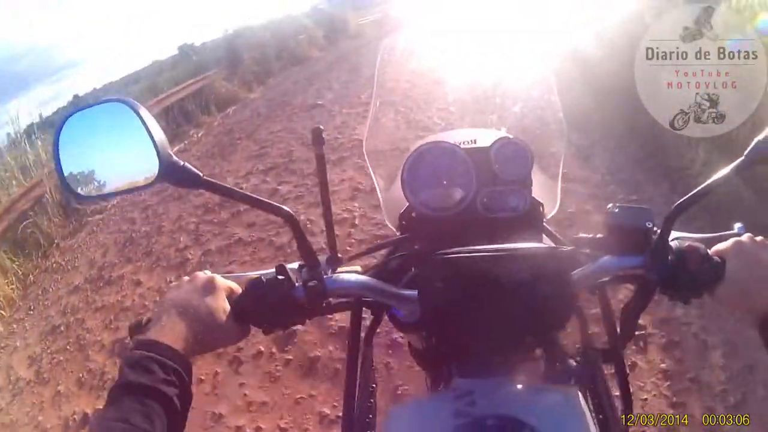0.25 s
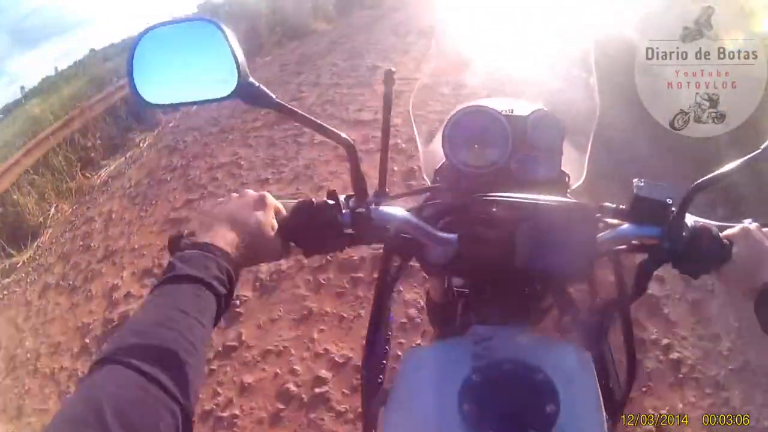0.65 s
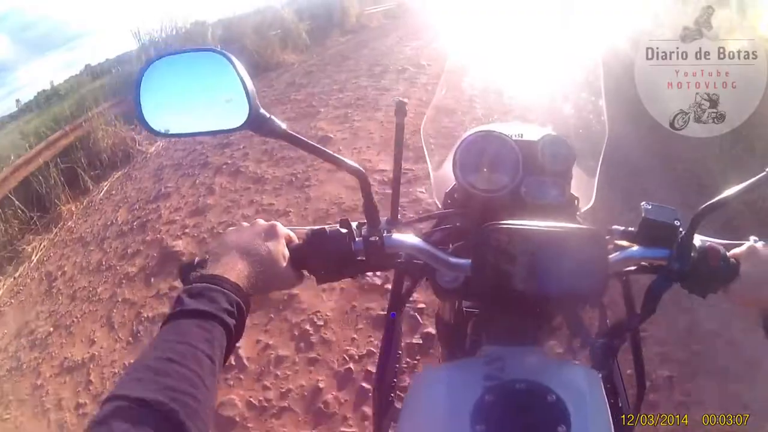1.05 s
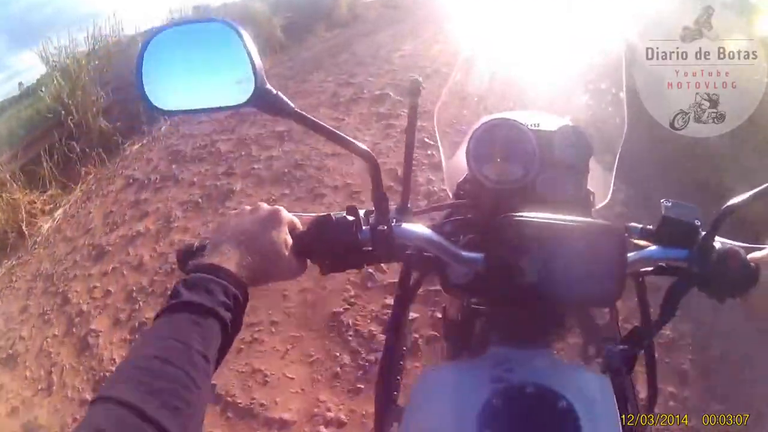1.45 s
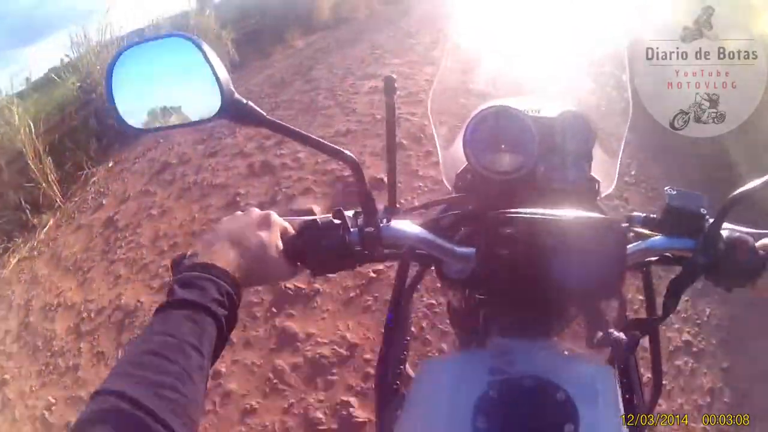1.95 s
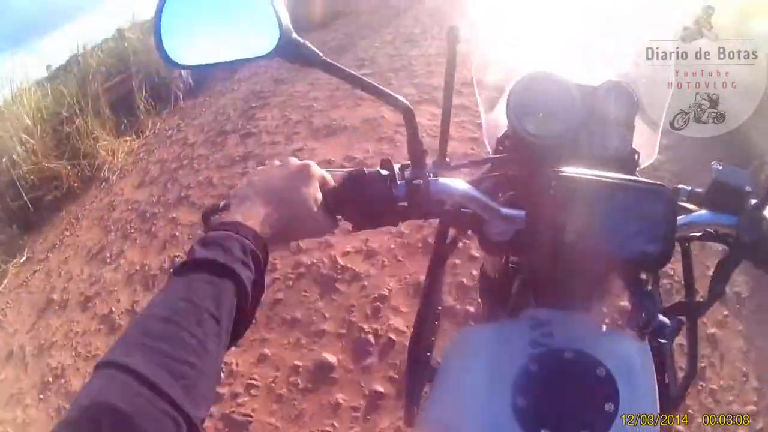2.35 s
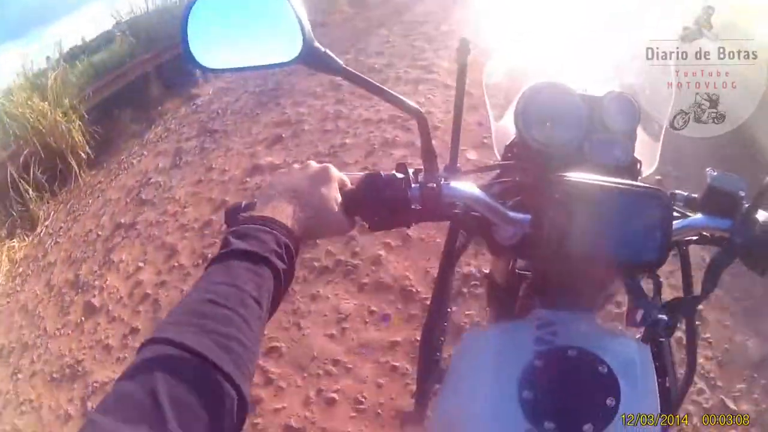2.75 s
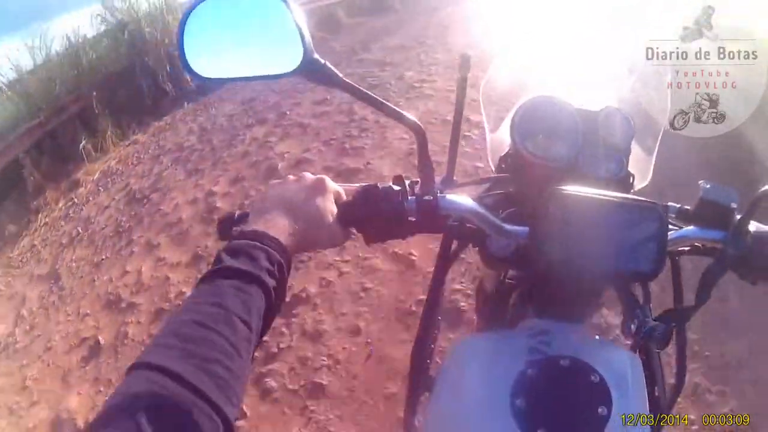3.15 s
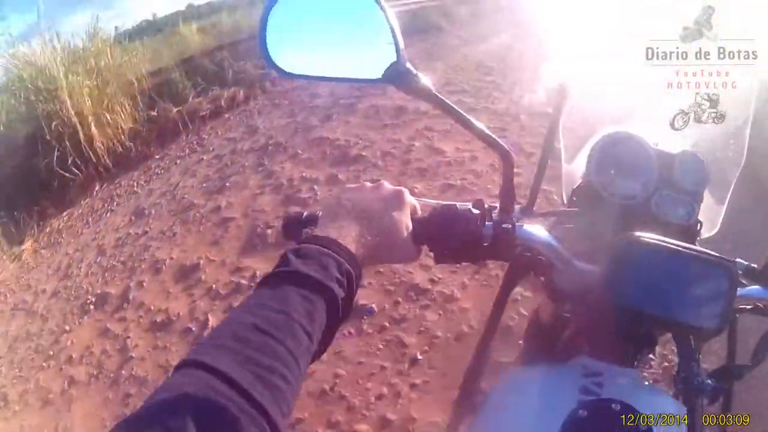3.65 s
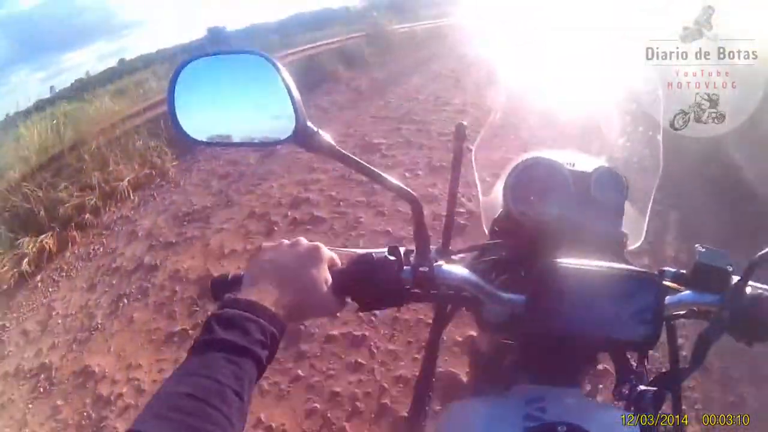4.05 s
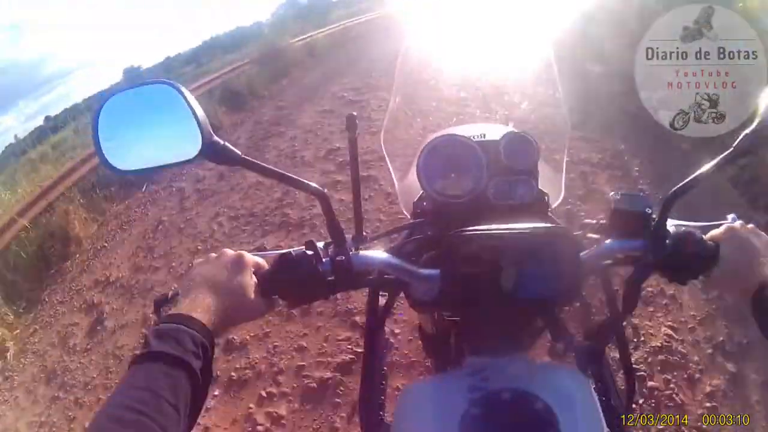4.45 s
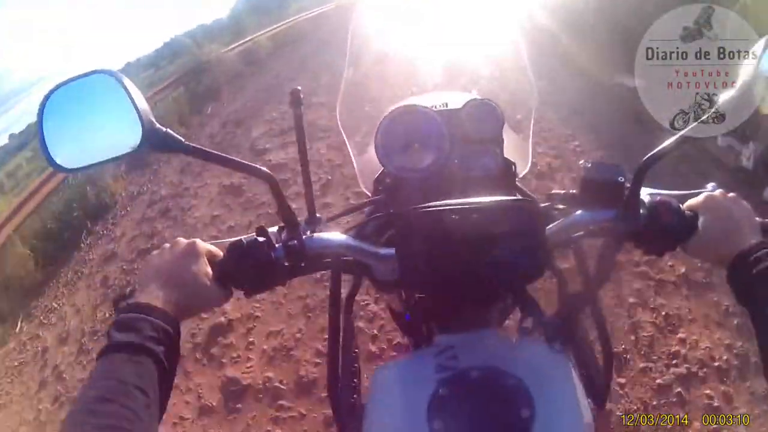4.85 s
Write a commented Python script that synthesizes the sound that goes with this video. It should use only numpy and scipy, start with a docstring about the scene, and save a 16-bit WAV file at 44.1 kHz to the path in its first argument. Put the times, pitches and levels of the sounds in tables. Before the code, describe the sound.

A single-cylinder motorcycle idles fast, close to a helmet microphone outdoors, with no audible echo. The exhaust makes soft, hollow low thumps about fifteen times a second, hunting a little in the first half second, briefly stronger near 2.3 s, then even. Dense dull metallic valve rattle pulses with it, and loose parts ring very faintly. Low rumble of tyres on dirt lies underneath. Small sharp metal ticks fall irregularly, clearest at 0.03, 1.6, 4.2 and 4.5 s. From 1.2 to 2.2 s the mount is jolted repeatedly, with deep muffled thuds, gritty scuffs and short woody stone knocks. Lighter jolts come at 2.6 and 3.4-3.6 s, leaving calm between. A faint short squeak at 4.6-4.75 s leads into the largest scuffing bump at 4.9 s, and jolting continues to the end. A constant high, buzzing electronic whine around 10 kHz and faint hiss persist throughout; the extreme top is cut off.

```python
"""A steady exhaust thump is heard first: a single-cylinder motorcycle idling as it rolls over a stony track.
Each firing excites damped pipe resonances, and dense valve contacts rattle through the modes of the cases.
Jolts of the microphone mount scuff and thud as shaped noise over the coloured noise of the rolling tyres.
Stones and small metal parts ring as struck modes, a joint squeaks by friction, and loose parts ring.
The helmet camera adds a buzzing whine, a tone of switched polarity, and a faint hiss."""
import sys
import numpy as np
from scipy import signal
from scipy.fft import rfft, irfft
from scipy.io import wavfile

SR = 44100
rng = np.random.default_rng(int(sys.argv[2]) if len(sys.argv) > 2 else 0)


def wrap_up_sound(samples):
    """Save the sound to the file named by the first command line argument, as 16-bit audio."""
    columns = np.atleast_2d(samples).T
    # keep every value between -1 and 1, then stretch to whole-number steps
    tamed = np.clip(columns, -1, 1)
    steps = np.round(tamed * 32767).astype(np.int16)
    wavfile.write(sys.argv[1], SR, steps)


N = 224896
TIME = np.arange(N) / SR   # s

# crankshaft speed, hunting at first and then settling: start_s, speed_rpm
CRANK_SPEED = [(0.0, 1627.1), (0.2, 1639.3), (0.4, 1938.3), (0.5, 1601.8), (0.65, 1813.0), (0.95, 1713.2),
               (1.1, 1807.1), (1.35, 1752.4), (1.55, 1829.9), (1.8, 1783.6), (2.2, 1807.7), (2.3, 1585.4),
               (2.4, 1840.7), (2.6, 1751.8), (2.75, 1821.6), (3.85, 1821.7), (4.0, 1832.4), (5.1, 1833.6)]
START_CYCLE, TURNS_PER_CYCLE = .744, 2   # engine cycles; crankshaft turns
FIRING_SCATTER_S = .0007
# strength of the exhaust thump, before each resonance's own level: start_s, level_db
THUMP_LEVEL = [(0, -31), (.45, -33), (.6, -30), (2.1, -33.5), (2.33, -27), (2.53, -32), (5.1, -32)]
# exhaust resonances: pitch_hz, width_hz, level_db, build_up_stages, lag_s
EXHAUST_MODES = [(52, 23, -15, 2, .004), (94, 52, -1, 2, 0), (289, 90, -3.5, 3, .0022),
                 (395, 140, -10, 3, .0022)]
# level of the valve rattle: start_s, level_db
RATTLE_LEVEL = [(0, -50), (1.2, -48), (2.5, -47), (4.3, -49), (5.1, -46.5)]
# resonances of the engine cases: pitch_hz, width_hz, level_db
CASE_MODES = [(511.4, 70, -4), (865.5, 33, -1.5), (909.6, 28, -8.5), (968, 20, -1.5), (1019, 21, -1),
              (1101, 71, -7.5), (1338, 308, -4.5), (1980, 280, -16), (2290, 185, -15.5), (2870, 620, -18.5),
              (4300, 530, -23.5), (5250, 900, -41)]
# jolts through the microphone mount, edge and thud relative to the scuff:
# peak_s, scuff_db, rise_s, fall_s, edge_db, thud_db
JOLT_EVENTS = [(1.232, -35, 0.067, 0.044, -22, 8), (1.378, -30, 0.057, 0.065, -8.5, 7),
               (1.46, -52.5, 0.04, 0.024, -27, 8.9), (1.612, -38, .012, 0.044, -13, 8.5),
               (1.648, -37.5, 0.05, 0.062, -20, 5.8), (1.779, -39, 0.034, .06, -11, 5.5),
               (1.818, -39.5, 0.047, 0.046, -15, 5), (1.857, -31.5, 0.06, 0.048, -12, 4),
               (1.95, -43, 0.035, 0.05, -27, 4.3), (2.025, -39.5, 0.13, 0.065, -31, 5.4),
               (2.188, -41.5, 0.023, 0.042, -35, 4.7), (2.636, -41, 0.019, 0.036, -28, 7),
               (3.378, -45.5, 0.011, 0.061, -13.5, 5), (3.458, -40, 0.013, 0.041, -34, 8.6),
               (3.57, -40, 0.0092, 0.031, -32, 6.8), (3.606, -45.5, 0.017, 0.024, -18, 7.4),
               (4.655, -49, 0.024, 0.07, -9, 3.4), (4.742, -35, 0.077, 0.098, -12, 2),
               (4.856, -33.5, 0.021, 0.055, -10, 1.5), (4.895, -24.5, .055, 0.084, -11, 2.4),
               (4.965, -39, .03, 0.033, -18, 1.7), (5.04, -35.5, 0.075, 0.068, -12.5, 1.5),
               (5.095, -33, 0.086, .05, -12, 1.3)]
JOLT_DROP_DB, JOLT_ROUNDNESS = 18.5, 1.61   # loss one rise or fall from the peak; power of its growth
EDGE_NARROWING = 2.22   # the edge loses this many times more decibels
# spectrum of tyres and air, relative level per Hz: pitch_hz, level_db
ROAD_COLOUR = [(12, -14), (20, -9.5), (92, -5.5), (117, -6.5), (188, -7.5), (283, -5.5), (650, -21.5),
               (840, -13), (1430, -120)]
ROLLING_DB = -47.5   # mean level of the road rumble
# stones knocking the frame, before each mode's own level: start_s, level_db
STONE_KNOCKS = [(1.3757, -38), (1.6072, -44), (1.6359, -33), (1.7782, -35.5), (1.8531, -27), (2.0279, -38),
                (2.187, -61), (2.4884, -44), (2.6339, -41), (3.373, -41), (3.4444, -53), (3.5647, -58),
                (3.5922, -41.5), (4.7158, -33), (4.883, -39.5)]
# modes of the knocked frame: pitch_hz, level_db, t60_s
FRAME_MODES = [(282, 7.5, 0.042), (835, 3, 0.0053), (1590, 8, 0.0029), (2640, -25, 0.036),
               (4250, -26, 0.0077)]
# ticks of a small metal part, before each mode's own level: start_s, level_db
METAL_TICKS = [(0.0179, -63), (0.0302, -38), (0.4095, -48.5), (0.7457, -45.5), (0.7891, -52), (0.8131, -52),
               (1.1418, -62), (1.1548, -48), (1.2715, -49), (1.5524, -40.5), (1.5848, -32.5), (2.794, -44),
               (2.813, -41), (4.0716, -49.5), (4.2053, -37), (4.5198, -36.5)]
# modes of the small metal part: pitch_hz, level_db, t60_s
METAL_MODES = [(2780, -7.5, 0.0012), (4570, -8, 0.012), (5270, -16.5, 0.0088), (5840, -25, 0.015),
               (7040, -21.5, 0.019), (14500, -24, 0.0074)]
# squeak of a rubbing joint: start_s, low_ring_db, high_rings_db
SQUEAK_LEVEL = [(4.6, -65, -90), (4.625, -48, -75), (4.66, -53, -67), (4.7, -61, -62), (4.73, -48, -58),
                (4.76, -85, -88)]
# lower resonance of the joint: pitch_hz, width_hz, level_db
JOINT_LOW_MODES = [(1530, 360, 0)]
# upper resonances of the joint: pitch_hz, width_hz, level_db
JOINT_HIGH_MODES = [(3800, 440, -5), (5500, 530, -4)]
# resonances of the loose parts: pitch_hz, width_hz, level_db
LOOSE_MODES = [(1925, 48, 0.5), (2560, 25, -3.5), (3024, 46, -6), (3330, 78, -10), (4400, 230, -11.5),
               (5000, 190, -11.5)]
LOOSE_DB = -68
# level before the low-pass; clock rate and phase; tone periods per clock period
WHINE_DB, CLOCK_HZ, CLOCK_START_S, WHINE_TURNS = -42.5, 38.2452, .0059, 262
HISS_DB, CUTOFF_HZ = -69.5, 15800


def from_db(db):
    """Logarithmic level: decibels become an amplitude gain."""
    return 10 ** (np.asarray(db) / 20)


def rms_one(x):
    """Normalisation: the signal is scaled to unit rms."""
    return x / np.sqrt(np.mean(x ** 2) + 1e-20)


def butter(x, hz, kind, order=2):
    """Maximally flat filtering: a recursive low-, high- or band-pass."""
    return signal.sosfilt(signal.butter(order, hz, kind, fs=SR, output="sos"), x)


def drift(rate_hz):
    """Band-limited chance: low-passed noise of unit spread."""
    noise = rng.standard_normal(N + SR)
    return rms_one(butter(noise, rate_hz, "low")[SR:])   # the filter's start is dropped


def resonance(x, hz, width_hz):
    """Damped oscillator: a two-pole peak with gain 1 on top."""
    r = np.exp(-np.pi * width_hz / SR)
    feedback = [1, -2 * r * np.cos(2 * np.pi * hz / SR), r * r]
    return signal.lfilter([(1 - r * r) / 2, 0, (r * r - 1) / 2], feedback, x)


def body(x, modes):
    """Modal superposition: parallel resonances, each applied twice, leave deep valleys between them."""
    total = 0
    for k, (hz, width_hz, level_db) in enumerate(modes):
        ring = resonance(resonance(x, hz, width_hz), hz, width_hz * 2)
        total = total + from_db(level_db) * (-1) ** k * rms_one(ring)
    return rms_one(total)


def grains(per_s, spread_db):
    """Random impulses: clicks at chance instants, a few much bigger than the rest."""
    sizes = from_db(spread_db * np.minimum(rng.exponential(1, N), 5))
    signs = rng.choice([-1, 1], N)
    return sizes * signs * (rng.random(N) < per_s / SR)


def cycles():
    """Integrated rotation: crankshaft speed accumulates into engine cycles."""
    rpm = np.interp(TIME, *np.transpose(CRANK_SPEED))
    return START_CYCLE + np.cumsum(rpm) / (60 * TURNS_PER_CYCLE * SR)


def exhaust():
    """Cascaded resonance: each firing sucks, then rings chambers in a row that swell before they decay."""
    at = np.flatnonzero(np.diff(np.floor(cycles())))
    at = at + (rng.normal(0, FIRING_SCATTER_S, len(at)) * SR).astype(int)
    thump_db = np.interp(at / SR, *np.transpose(THUMP_LEVEL)) + rng.normal(0, 1.6, len(at))
    out = np.zeros(N)
    for hz, width_hz, level_db, stages, lag_s in EXHAUST_MODES:
        puffs = np.full(N + SR, 1e-18 + 0j)
        puffs[at + int(lag_s * SR)] = from_db(thump_db + level_db + rng.normal(0, 1.1, len(at)))
        r = np.exp(-np.pi * width_hz / SR)
        for stage in range(stages):
            puffs = signal.lfilter([1], [1, -r * np.exp(2j * np.pi * hz / SR)], puffs)
        k = np.arange(SR)
        swell = np.max(k ** (stages - 1) * r ** k) / (stages - 1)   # envelope height for a unit puff
        out -= puffs.imag[:N] / swell   # negative: suction comes first
    return out


def valve_gear():
    """Impact excitation: dense small contacts ring the cases, hardest late in each cycle as valves work."""
    beat_db = 2.5 * np.cos(2 * np.pi * (cycles() - .88))
    contacts = grains(2400, 2.8) * from_db(beat_db + 2.2 * drift(25))
    level_db = np.interp(TIME, *np.transpose(RATTLE_LEVEL))
    return from_db(level_db) * body(contacts, CASE_MODES)


def jolts():
    """Stick and slip: uneven slips of the mount give a scuff, a finer gritty edge and a deep thud."""
    slips = grains(1200, 3.4)
    grit = grains(4000, 3.2) * from_db(3.0 * drift(150))
    scuff = rms_one(butter(butter(slips, [280, 750], "band", order=1), 1470, "low"))
    edge = rms_one(butter(butter(grit, [1200, 2500], "band", order=1), 4500, "low"))
    thud = rms_one(butter(butter(slips, [70, 300], "band", order=1), 490, "low"))
    return np.sum(jolt_swells() * [scuff, edge, thud], axis=0)


def jolt_swells():
    """Power addition: overlapping jolts rise and sink, the edge gathering closer around each peak."""
    power = np.zeros((3, N))
    for peak_s, scuff_db, rise_s, fall_s, edge_db, thud_db in JOLT_EVENTS:
        near = slice(int((peak_s - 3 * rise_s) * SR), int((peak_s + 3 * fall_s) * SR))
        t = TIME[near] - peak_s
        loss_db = JOLT_DROP_DB * np.abs(t / np.where(t < 0, rise_s, fall_s)) ** JOLT_ROUNDNESS
        power[:, near] += from_db([scuff_db - loss_db,
                                   scuff_db + edge_db - EDGE_NARROWING * loss_db,
                                   scuff_db + thud_db - loss_db]) ** 2
    return np.sqrt(power)


def road():
    """Spectral shaping: white noise takes the colour of tyres and air, and its level is slightly lumpy."""
    hz, level_db = np.transpose(ROAD_COLOUR)
    bins_hz = np.arange(N // 2 + 1) * SR / N
    colour = from_db(np.interp(np.log(bins_hz + 1), np.log(hz), level_db))
    lumps_db = 1.5 * drift(8)
    rumble = rms_one(irfft(rfft(rng.standard_normal(N)) * colour, N))
    return from_db(ROLLING_DB + lumps_db) * rumble


def blows(events, modes, bounce_s):
    """Modal impact: a few quick contacts per blow strike every mode with strengths of their own."""
    start_s, blow_db = np.transpose(events)
    delay_s = bounce_s * rng.random((len(start_s), 3)) * [0, 1, 1]   # one contact at once, two later
    chance_db = rng.normal(0, 2.5, (len(start_s), 3, len(modes)))
    at = ((start_s[:, None] + delay_s) * SR).astype(int)
    out = np.zeros(N)
    for k, (hz, level_db, t60_s) in enumerate(modes):
        clicks = np.full(N, 1e-18)
        clicks[at] = from_db(blow_db[:, None] + level_db + chance_db[:, :, k])
        r, w = from_db(-60 / (t60_s * SR)), 2 * np.pi * hz / SR
        out += signal.lfilter([0, np.sin(w)], [1, -2 * r * np.cos(w), r * r], clicks)
    return out


def stone_knocks():
    """Contact softening: rubber and dirt low-pass the knocks of stones on the frame."""
    return butter(blows(STONE_KNOCKS, FRAME_MODES, 0.00316), 3800, "low")


def metal_ticks():
    """Free modal decay: a small metal part rings after each tick."""
    return blows(METAL_TICKS, METAL_MODES, 0.0026)


def squeak():
    """Frictional excitation: rubbing noise drives a few resonances, the upper ones swelling later."""
    start_s, low_db, high_db = np.transpose(SQUEAK_LEVEL)
    rub = grains(1200, 1.7)
    low_ring = from_db(np.interp(TIME, start_s, low_db)) * body(rub, JOINT_LOW_MODES)
    high_rings = from_db(np.interp(TIME, start_s, high_db)) * body(rub, JOINT_HIGH_MODES)
    return low_ring + high_rings


def loose_parts():
    """Independent resonators: small parts shaken by the engine ring now and then, each on its own."""
    rings = 0
    for hz, width_hz, level_db in LOOSE_MODES:
        rings = rings + from_db(level_db) * rms_one(resonance(grains(60, 3.4), hz, width_hz))
    return from_db(LOOSE_DB) * rms_one(rings)


def whine():
    """Phase reversal: a slow clock flips a high tone at zero crossings; its height trembles slightly."""
    clock = 2 * np.pi * CLOCK_HZ * (TIME - CLOCK_START_S)
    polarity = np.sign(np.sin(clock))
    tone = np.sin(WHINE_TURNS * clock) * polarity * from_db(0.58 * drift(220))
    return from_db(WHINE_DB) * butter(tone, 11700, "low")


def hiss():
    """Random noise: the camera's steady hiss, gently low-passed."""
    return from_db(HISS_DB) * rms_one(butter(rng.standard_normal(N), 7000, "low", order=1))


def scene():
    """Superposition: all acoustic sources add at the one microphone."""
    engine = exhaust() + valve_gear() + loose_parts()
    ride = jolts() + road() + stone_knocks() + metal_ticks() + squeak()
    return (engine + ride)[None]


def record(dry):
    """Band limiting: the camera adds its whine and hiss, then cuts the top steeply."""
    top_cut = signal.ellip(12, .5, 70, CUTOFF_HZ, fs=SR, output="sos")   # .5 dB ripple, 70 dB stop
    return signal.sosfilt(top_cut, dry + whine() + hiss())


dry = scene()
out = record(dry)
wrap_up_sound(out)
```